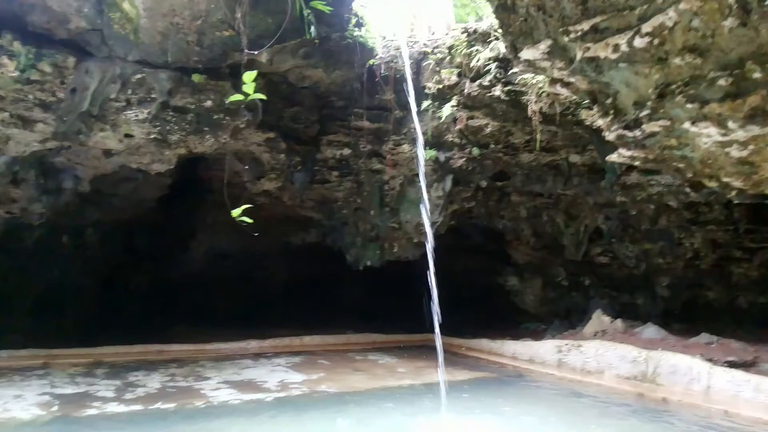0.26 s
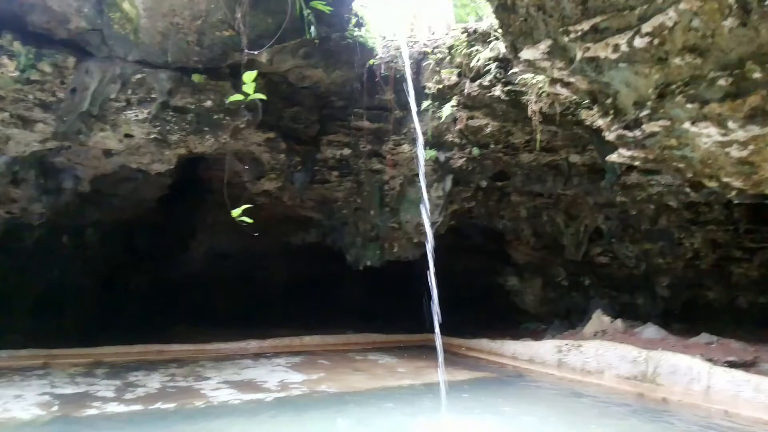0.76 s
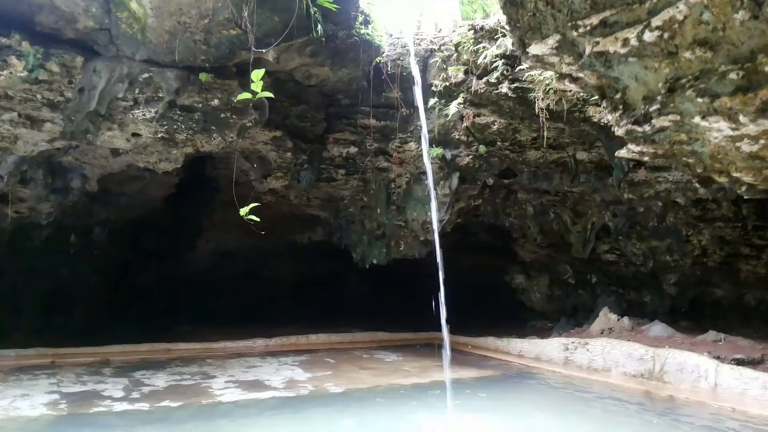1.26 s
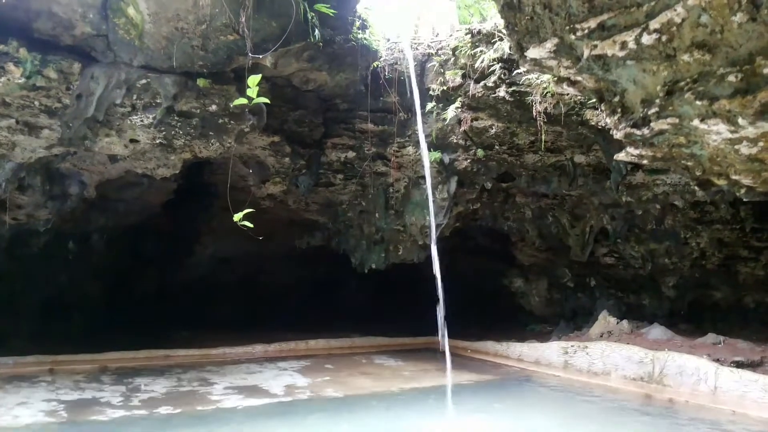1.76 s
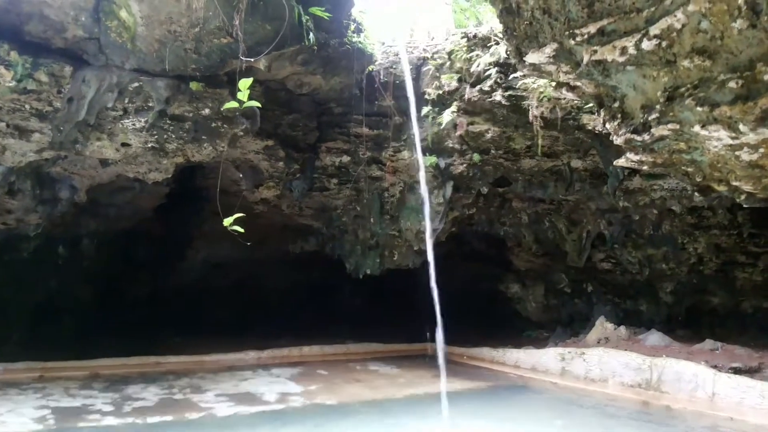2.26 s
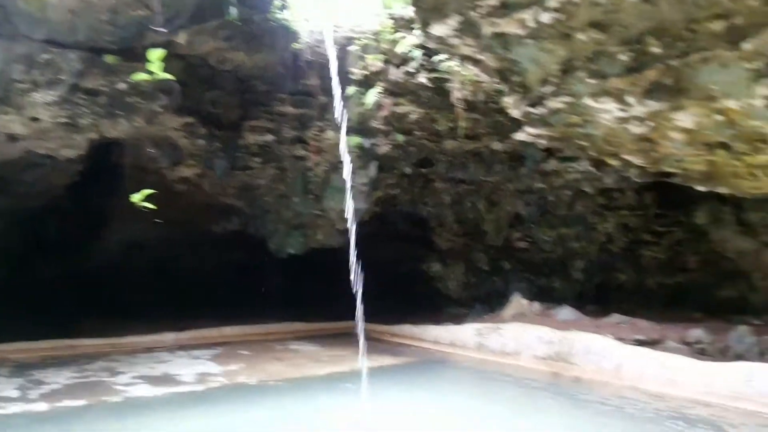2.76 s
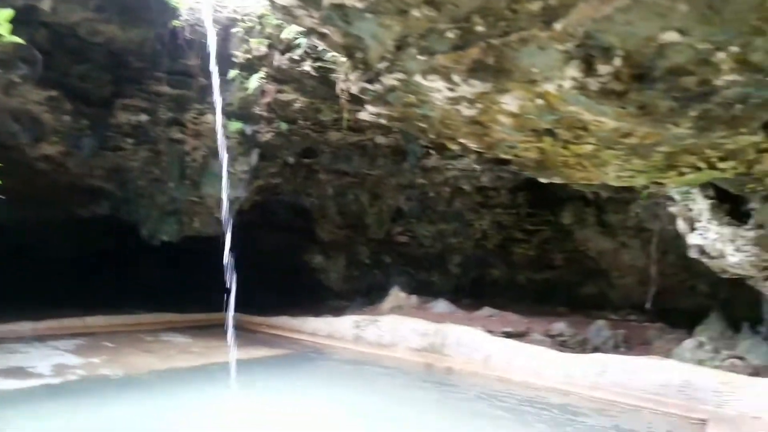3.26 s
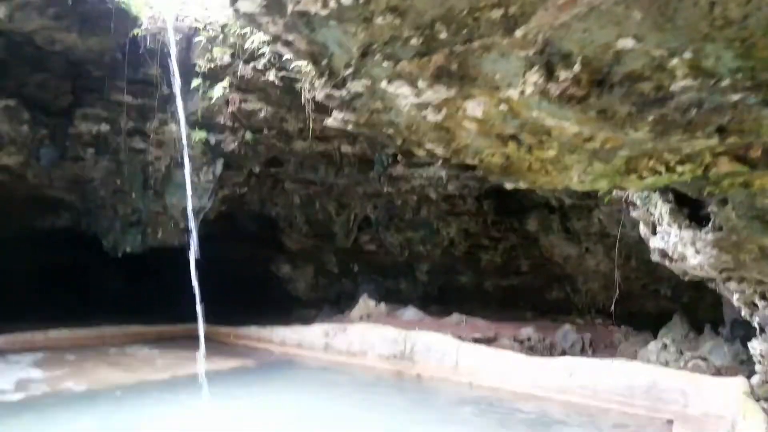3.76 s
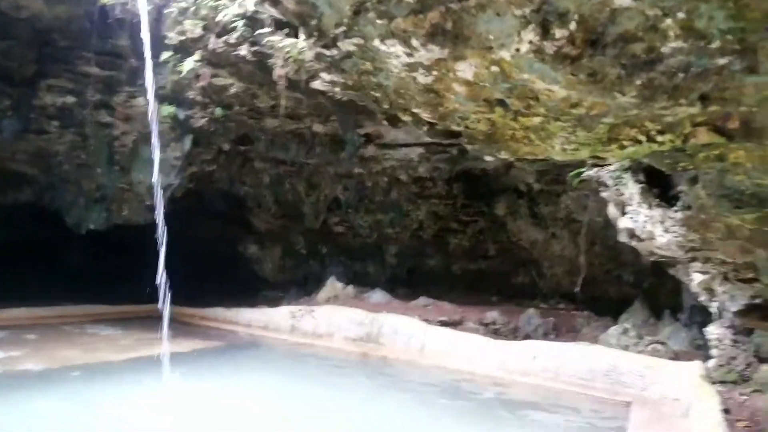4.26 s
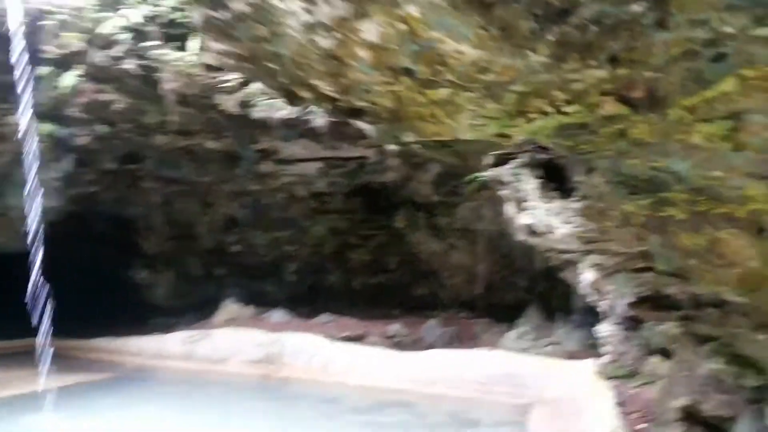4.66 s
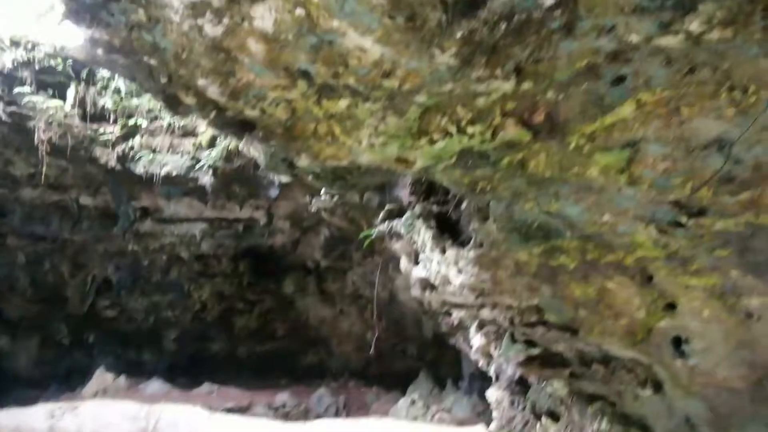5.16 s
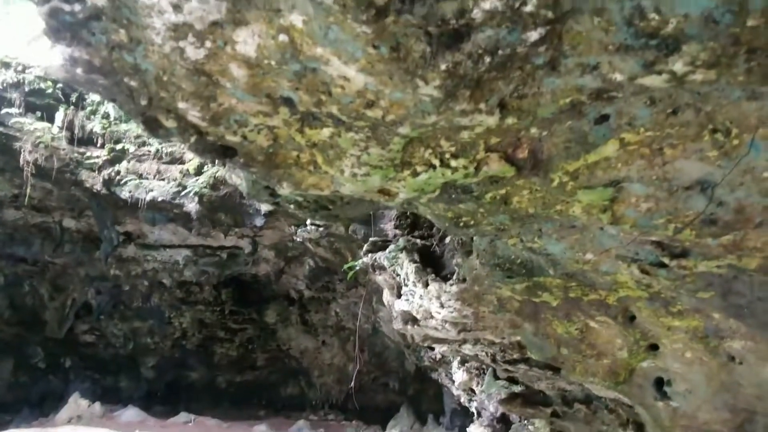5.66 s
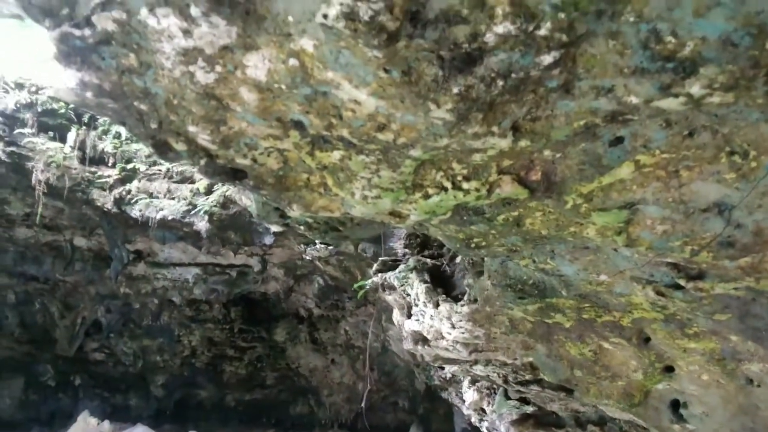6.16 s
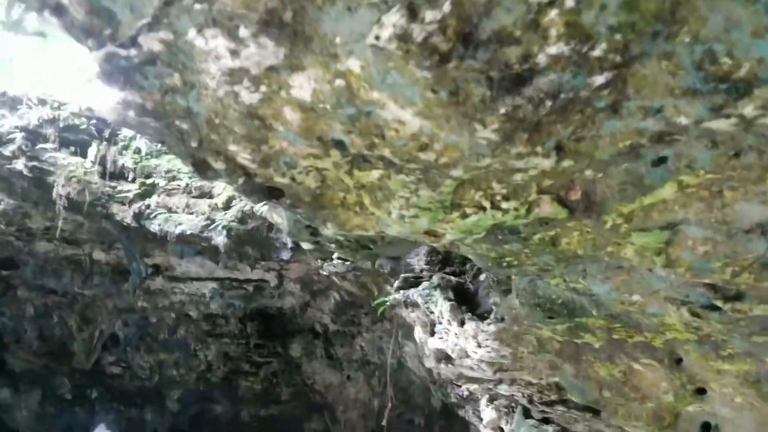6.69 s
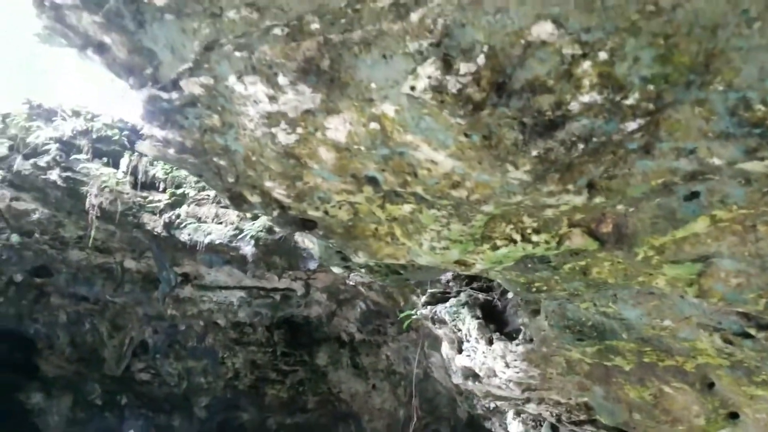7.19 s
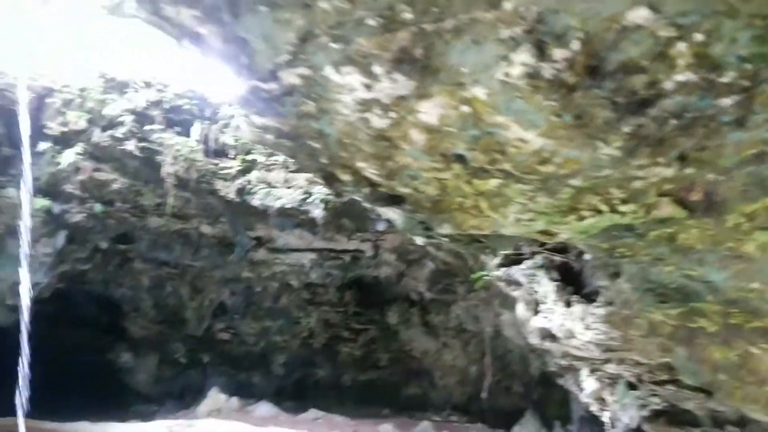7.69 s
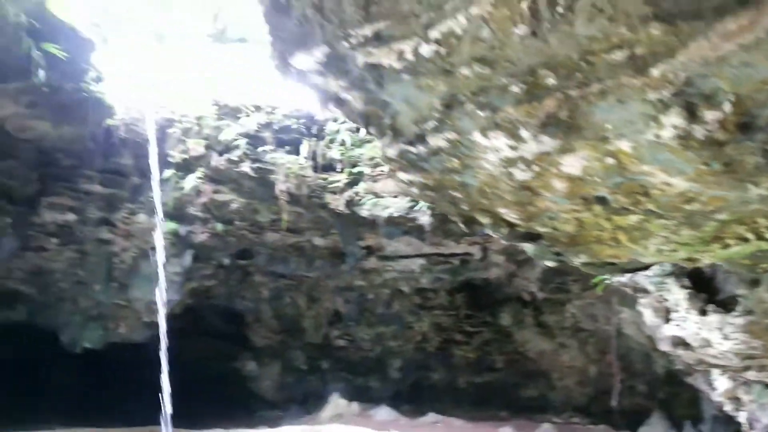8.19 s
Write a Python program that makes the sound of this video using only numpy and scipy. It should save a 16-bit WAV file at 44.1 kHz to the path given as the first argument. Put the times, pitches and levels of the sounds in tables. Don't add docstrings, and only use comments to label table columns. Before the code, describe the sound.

A thin waterfall pours continuously into a pool in a rocky cave. Bubbly mid-range splashing dominates, over low gurgles and a light spray hiss. Irregular lumps of water plop in with sharp gushes and popping bubbles. A very faint high whine swells at the start. Short stone reverberation; close small mono microphone, with sound vanishing briefly near 1.3, 4.4 and 7.4 seconds.

```python
import sys
import numpy as np
from scipy import signal
from scipy.fft import rfft, irfft, next_fast_len
from scipy.io import wavfile
from scipy.ndimage import uniform_filter1d, map_coordinates

SR = 44100
rng = np.random.default_rng(int(sys.argv[2]) if len(sys.argv) > 2 else 0)


def wav_out(sig):
    wavfile.write(sys.argv[1], SR, np.round(np.clip(np.atleast_2d(sig).T, -1, 1) * 32767).astype(np.int16))


def natural_amplitude(level_db):
    exponent = np.asarray(level_db, float) / 20
    return 10 ** exponent


N = 371763

# f/Hz, density/(dB per Hz)
POUR_SPECTRUM = [(260, -32), (450, -5), (567, -4), (714, -2), (1050, -4.5), (1340, -8.5), (1800, -2.5),
                 (2240, -2), (3550, -11.5), (5110, -25), (6200, -36.5), (7620, -38), (8200, -30),
                 (10700, -70), (18000, -120)]
# f/Hz, density/(dB per Hz)
SPRAY_SPECTRUM = [(4880, -41), (8300, -11), (8770, -16.5), (10000, -9), (11600, -9.5), (13500, -3.5),
                  (14400, -4), (15600, -11.5)]


def unit(x):
    return x / np.sqrt(np.mean(x ** 2) + 1e-20)


def along(points, hz):
    f, v = np.transpose(points)
    return np.interp(np.log(hz + 1), np.log(f + 1), v)


def resonances_db(rows, hz):
    return sum(db / (1 + (2 * (hz - centre) / width) ** 2) for centre, width, db in rows)


def swells_db(rows, half_width_s):
    t = np.arange(N) / SR
    return sum(db * np.exp(-.5 * ((t - s) / half_width_s) ** 2) for s, db in rows)


def tinted(x, spectrum):
    # f/Hz, width/Hz, level/dB
    hollows = [(139.8, 33, 6), (187.6, 32, 1.5), (264, 10, 3.5), (405, 35, -1), (700, 51, 0.5),
               (870, 36, 1), (1085, 28, 1.5), (1286, 240, 2), (1700, 15, 1.5)]
    m = next_fast_len(N + 8192)
    z, hz = rfft(x, m), np.fft.rfftfreq(m, 1 / SR)
    own = np.sqrt(np.abs(uniform_filter1d(np.abs(z) ** 2, size=1500)) + 1e-20)
    target = natural_amplitude(along(spectrum, hz) + resonances_db(hollows, hz))
    return unit(irfft(z / own * target, m)[:N])


def bubbles(start_s, hz, cycles, size, rise, length):
    t = np.arange(length) / SR
    life_s = (cycles / hz)[:, None]
    phase = 2 * np.pi * hz[:, None] * (t + rise * t * t / (2 * life_s))
    attack = 1 - np.exp(-t * hz[:, None] * 2)
    wave = size[:, None] * np.sin(phase) * np.exp(-3 * t / life_s) * attack
    at = (start_s * SR).astype(int)[:, None] + np.arange(length)
    return np.bincount(at.ravel(), wave.ravel(), N + length)[:N]


def swarm(low_hz, high_hz, cycles, spread_db, count, length):
    u = rng.random((count, 4))
    hz = low_hz * (high_hz / low_hz) ** u[:, 1]
    size = natural_amplitude(-spread_db * np.log(1 - .97 * u[:, 2]))
    return unit(bubbles(u[:, 0] * N / SR, hz, cycles * (.5 + u[:, 3]), size, 0.22, length))


def cave(x, wet_db):
    # f/Hz, t60/s
    decay = [(150, 0.59), (1000, 0.66), (4000, 0.78), (15000, 0.17)]
    step = SR // 6
    out = np.zeros(N + SR)
    hz, t, z = signal.stft(rng.standard_normal((N // step + 1, SR // 3)), SR, nperseg=256)
    tails = signal.istft(z * natural_amplitude(-60 * t / along(decay, hz)[:, None]), SR, nperseg=256)[1]
    for k, tail in enumerate(tails):
        echo = signal.fftconvolve(x[k * step:(k + 1) * step], tail / np.linalg.norm(tail))
        out[k * step + 200:][:len(echo)] += echo
    return x + natural_amplitude(wet_db) * out[:N]


def stream(grains, spectrum, wet_db, wash, size):
    near = unit(tinted(cave(grains, wet_db), spectrum))
    far = tinted(rng.standard_normal(N), spectrum)
    x = tinted(near + wash * far, spectrum)
    power = uniform_filter1d(uniform_filter1d(x * x, size), size)
    return x / np.sqrt(np.abs(power) + 1e-9)


def pour():
    # t/s, level/dB
    flow = [(0, -22.5), (.45, -24.5), (.75, -25), (1.27, -25), (1.6, -26.5), (1.9, -25.5), (2.3, -26.5),
            (2.75, -24), (3.1, -26.5), (3.6, -26), (4.3, -25.5), (4.7, -26), (4.95, -24), (5.5, -25.5),
            (6.4, -26), (6.85, -24), (7.3, -25), (8.43, -24.5)]
    # t/s, level/dB
    lulls = [(.045, -2), (.47, -2), (1.7, -0.5), (2.32, -1.5), (2.41, 0.5), (2.5, -1), (2.6, -1.5),
             (3.43, -1.5), (3.6, -2), (3.87, -1.5), (4.03, -1.5), (4.29, -0.5), (4.72, -1), (5.04, -1.5),
             (5.14, -2), (5.6, -0.5), (5.92, -1), (6.01, -0.5), (6.44, -2), (6.5, -1), (7.0, -2),
             (7.75, -1.5), (8.06, 0.5), (8.32, -1)]
    # t/s, swell of the gurgle/dB
    glugs = [(.15, 5.5), (.33, 6), (.535, 6), (1.05, 0), (1.2, 4), (1.6, 3), (1.82, 5.5), (2.46, 6),
             (2.7, 4), (2.9, 3.5), (3.66, 4.5), (3.76, 3), (4.07, 1.5), (4.33, 4), (4.77, 0.5), (4.95, 3),
             (5.28, 5.5), (5.5, 1), (5.72, 3.5), (6.11, 6), (6.54, 3), (7.15, 5), (7.74, 3.5), (8.365, 6)]
    # f/Hz, density/(dB per Hz)
    gurgle_spectrum = [(15, -72), (25, -53.5), (64, -15), (102, -11.5), (134, -10), (163, -7), (193, -1.5),
                       (403, 4.5), (550, -5), (720, -38), (1210, -120)]
    flutter_db, flutter_per_s = 0.43, 14
    gurgle_rel_db, spray_rel_db = -9.5, -25
    spray_growth = 1.1

    t = np.arange(N) / SR
    flow_db = np.interp(t, *np.transpose(flow))
    flow_db = flow_db + flutter_db * map_coordinates(rng.standard_normal(300), [t * flutter_per_s])
    flow_db = flow_db + swells_db(lulls, half_width_s=0.016)
    gurgle_db = flow_db + gurgle_rel_db + swells_db(glugs, half_width_s=0.025)
    mean_db = flow_db.mean()
    spray_db = mean_db + spray_rel_db + spray_growth * (flow_db - mean_db)

    mid = swarm(401.0, 7970, 7.86, 4.2, count=14000, length=300)
    large = swarm(59.6, 607, 6.0, 0.71, count=1600, length=2000)
    droplets = swarm(8000, 16000, 1.2, 3.6, count=12000, length=30)
    body = stream(mid, POUR_SPECTRUM, wet_db=-1.0, wash=0.87, size=2500)
    deep = stream(large, gurgle_spectrum, wet_db=2.0, wash=0.92, size=4000)
    fizz = stream(droplets, SPRAY_SPECTRUM, wet_db=3.0, wash=0.81, size=1500)
    return natural_amplitude(flow_db) * body + natural_amplitude(gurgle_db) * deep + natural_amplitude(spray_db) * fizz


def whine():
    # t/s, level/dB rms
    tone_swells = [
        (0, -42.5),
        (1.75, -46.5),
        (7.7, -50),
    ]
    tone_hz, rest_db, fade_db_per_s = 3957, -65, 71
    t = np.arange(N) / SR
    level = natural_amplitude(rest_db) + sum(natural_amplitude(db - fade_db_per_s * np.abs(t - s)) for s, db in tone_swells)
    return np.sqrt(2) * level * np.sin(2 * np.pi * tone_hz * t)


def drops():
    # t/s, peak/dB
    ticks = [(0.0252, -34.5), (0.0841, -28), (0.33, -36), (0.62, -35), (0.6822, -34.5), (0.7516, -32.5),
             (1.233, -34.5), (1.73, -31.5), (1.8127, -35), (1.9179, -36.5), (2.3455, -34.5), (2.9366, -40),
             (3.0738, -33.5), (3.1611, -44), (3.8126, -43), (4.1199, -33.5), (4.7455, -37.5), (5.2549, -35),
             (5.8261, -43), (6.3149, -37.5), (6.5634, -37), (6.6337, -32.5), (6.8208, -32), (7.2498, -33),
             (7.3446, -38.5), (7.6045, -37), (8.0191, -31), (8.0739, -34.5)]
    decay_s = 0.0027
    swell, t = np.zeros(N + SR), np.arange(SR // 50) / SR
    for start_s, db in ticks:
        swell[round(start_s * SR):][:len(t)] += natural_amplitude(db - 6) * np.exp(-t / decay_s)
    return swell[:N] * tinted(rng.standard_normal(N), SPRAY_SPECTRUM)


def plunges():
    # t/s, peak/dB, main bubble f/Hz, life/s
    lumps = [(0.06, -10.5, 1250, .033), (0.239, -14, 1940, 0.02), (0.496, -15.5, 2080, 0.062),
             (0.523, -11.5, 1533, .04), (0.683, -10.5, 1430, 0.02), (1.723, -10, 1032, .045),
             (1.779, -16, 470, .056), (2.341, -8, 2260, .035), (2.449, -11, 2000, 0.064),
             (2.529, -9, 1210, 0.031), (2.619, -14, 1055, .06), (2.699, -12, 438, .04),
             (2.809, -14, 1825, .084), (3.63, -15.5, 470, .07), (4.058, -11.5, 2330, 0.032),
             (4.311, -11.5, 2020, .061), (4.849, -7, 1970, 0.034), (5.061, -9, 1880, 0.055),
             (5.246, -10, 1110, 0.05), (5.275, -8, 926, 0.043), (5.7, -11, 755, 0.061),
             (5.944, -9, 897, .04), (6.034, -8.5, 2510, 0.022), (6.457, -11.5, 653, .027),
             (6.525, -9, 1070, .06), (7.017, -12.5, 805, 0.036), (7.149, -11.5, 1816, 0.047),
             (7.768, -14.5, 2230, .04), (8.077, -10, 1900, 0.04), (8.347, -11, 980, .05)]
    main_db, cloud_db, gush_db = -15, -18, -13
    mist_db = -28.5
    split_hz, lean_db_per_octave = 1640, 1.5
    s, db, hz, life_s = np.transpose(lumps)
    life_s = np.clip(life_s, .005, .2)
    main = bubbles(s, hz, 1.8 * life_s * hz, natural_amplitude(db + main_db), 0.041, 3500)

    u = rng.random((len(s), 3, 12))
    born_s = s[:, None] - .4 * life_s[:, None] * np.log(1 - .9 * u[:, 0])
    pitch_hz = np.clip(hz[:, None] * 1.8 ** (2 * u[:, 1] - .8), 150, 4000)
    sizes = natural_amplitude(db + cloud_db)[:, None] * (0.26 + u[:, 2])
    cycles = np.full(pitch_hz.size, 8.)
    cloud = bubbles(born_s.ravel(), pitch_hz.ravel(), cycles, sizes.ravel(), 0.36, 1500)

    swell, t = np.zeros((2, N + SR)), np.arange(SR // 4) / SR
    rise = 1 - np.exp(-t / .001)
    lean_db = lean_db_per_octave * np.log2(hz / split_hz)
    for start_s, level_db, lean, span_s in zip(s, db + gush_db, lean_db, life_s):
        envelope = np.exp(-(t / (1.05 * span_s)) ** 1.5) * rise
        level = natural_amplitude(level_db + np.array([[-lean], [lean]]))
        swell[:, round(start_s * SR):][:, :len(t)] += level * envelope
    colour = POUR_SPECTRUM[:-2] + [(f, d + mist_db) for f, d in SPRAY_SPECTRUM[2:]]
    noise = tinted(rng.standard_normal(N), colour)
    low = signal.sosfiltfilt(signal.butter(2, split_hz, fs=SR, output='sos'), noise)
    gush = swell[0, :N] * low + swell[1, :N] * (noise - low)
    return cave(main + cloud + gush, wet_db=-3.0)


def pops():
    # t/s, peak/dB, f/Hz
    bursts = [(0.063, -4, 1078), (0.075, -4, 1610), (0.356, -8, 810), (0.525, -10.5, 1500),
              (0.685, -7, 1410), (2.097, -11.5, 854), (2.34, -9.5, 1690), (2.453, -6, 1490),
              (2.466, -13.5, 2300), (2.353, -7, 1890), (4.062, -8, 1160), (4.314, -10.5, 1860),
              (4.746, -8.5, 1930), (4.795, -9.5, 1960), (4.853, -12, 2020), (4.944, -9, 1825),
              (5.063, -21, 1890), (5.197, -17.5, 870), (5.275, -7, 887), (5.297, -12, 2440),
              (5.617, -9.5, 2160), (5.947, -17, 1730), (6.036, -10, 2400), (6.245, -9.5, 700),
              (6.46, -14, 735), (6.557, -8, 925), (7.02, -13, 1890), (7.769, -13, 2420), (7.964, -8, 2080),
              (8.079, -10, 733)]
    # t/s, level/dB, f/Hz, life/s
    pockets = [(8.346, -19, 992, .2), (8.36, -22, 1650, .12), (0.57, -22, 560, 0.049),
               (1.05, -27.5, 650, 0.28), (6.2, -31.5, 590, 0.41), (6.46, -27, 690, 0.092),
               (.318, -20, 212, 0.055), (0.31, -23.5, 816, .05), (5.5, -26, 662, .05),
               (6.859, -23.5, 660, 0.061), (7.045, -21, 720, 0.087), (4.77, -25.5, 215, 0.072),
               (4.95, -27.5, 200, 0.09), (2.2, -29.5, 270, .15)]
    slap_db, slap_s = -7, 0.0014
    s, db, hz = np.transpose(bursts)
    short = bubbles(s, hz, .009 * hz, natural_amplitude(db - 4), .15, 600)
    twin = bubbles(s + .001, 1.5 * hz, .008 * hz, natural_amplitude(db - 10), .15, 600)
    slap = bubbles(s, 1.25 * hz, 3 * slap_s * hz, natural_amplitude(db + slap_db), .1, 600)
    s, db, hz, life_s = np.transpose(pockets)
    hum = bubbles(s, hz, life_s * hz, natural_amplitude(db), 0.0047, SR // 3)
    return short + twin + slap + hum


def scene():
    return (pour() + whine() + drops() + plunges() + pops())[None]


def top_cut(x):
    return signal.sosfilt(signal.butter(12, 15730, fs=SR, output="sos"), x)


def record(dry):
    # f/Hz, width/Hz, level/dB
    notch = (8220, 270, -39.5)
    # low f/Hz, high f/Hz
    band_hz = (45, 15730)
    # t lost/s, t back/s
    dropouts = [
        (1.2812, 1.4508),
        (4.3852, 4.5525),
        (7.3715, 7.5410),
    ]
    cut_s, fade_s = 0.00034, .003
    recover_db, recover_s = -4.5, 0.031
    hz, t = np.fft.rfftfreq(N, 1 / SR), np.arange(N) / SR
    gain = np.ones(N)
    for lost_s, back_s in dropouts:
        since_s = np.clip(t - back_s, 0, 1)
        cut = np.clip(1 - np.clip(t - lost_s, 0, 1) / cut_s, 0, 1)
        fade = (1 - 0.62 * np.exp(-since_s / 0.01)) * np.clip(since_s / fade_s, 0, 1)
        recovery = natural_amplitude(recover_db * np.exp(-since_s / recover_s))
        gain *= np.where(t < back_s, cut, fade * recovery)
    band = (hz < band_hz[1]) / (1 + (band_hz[0] / (hz + 1)) ** 4)
    x = irfft(rfft(dry) * natural_amplitude(resonances_db([notch], hz)) * band, N)
    return top_cut(x * gain)


dry = scene()
out = record(dry)
wav_out(out)
```